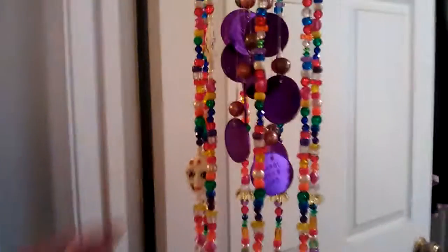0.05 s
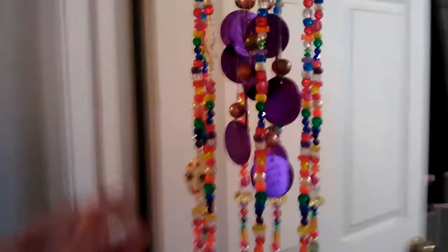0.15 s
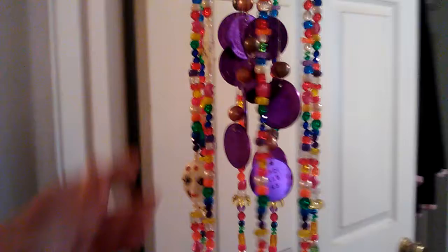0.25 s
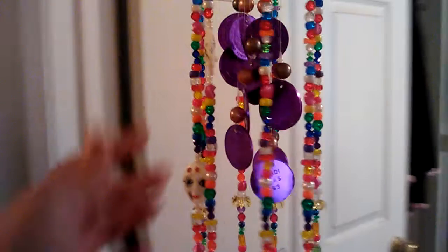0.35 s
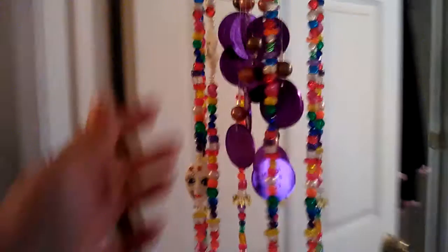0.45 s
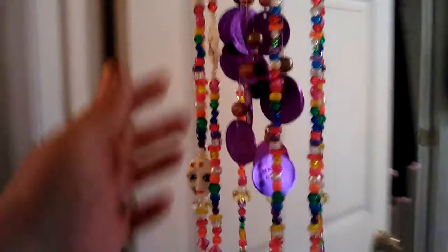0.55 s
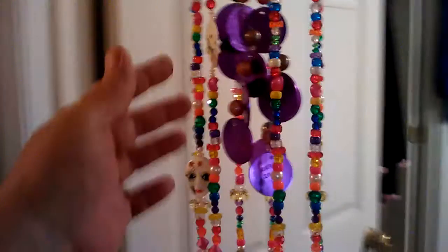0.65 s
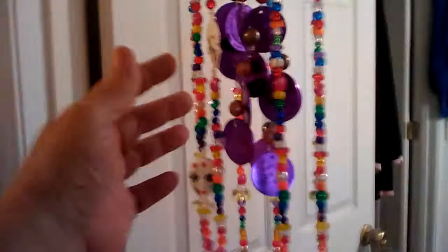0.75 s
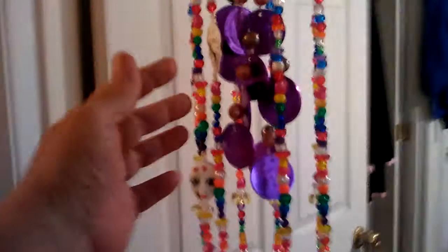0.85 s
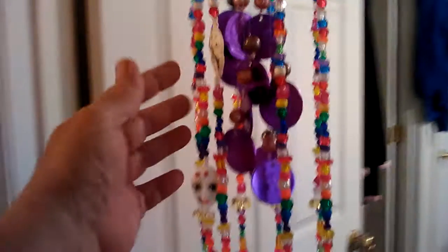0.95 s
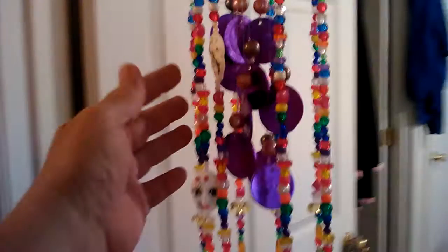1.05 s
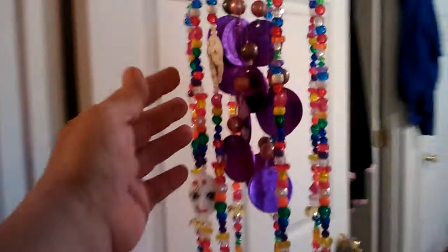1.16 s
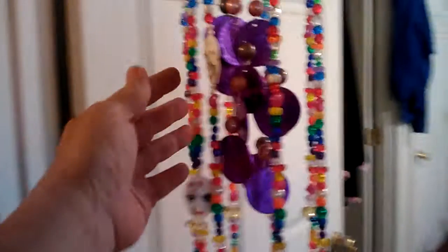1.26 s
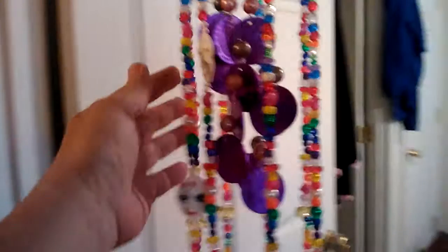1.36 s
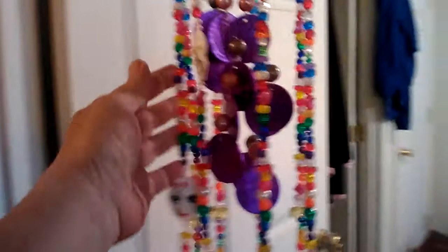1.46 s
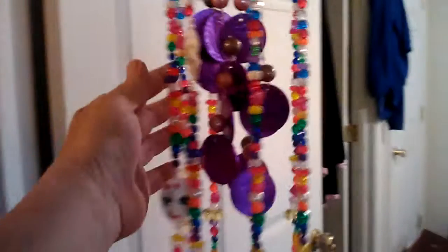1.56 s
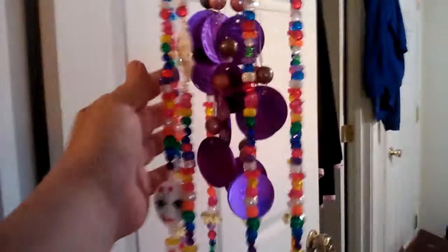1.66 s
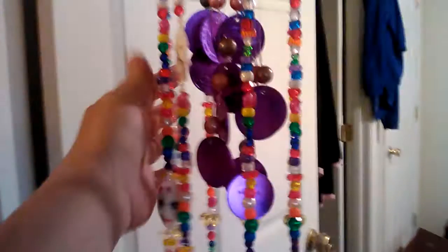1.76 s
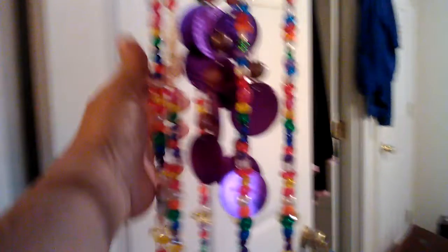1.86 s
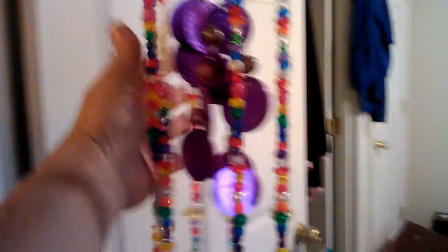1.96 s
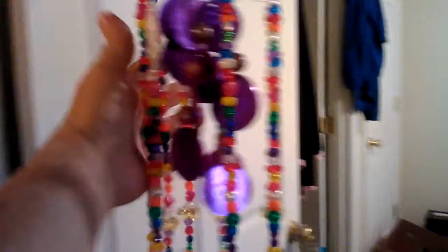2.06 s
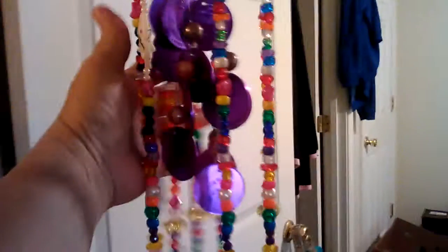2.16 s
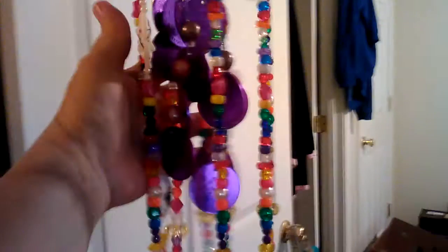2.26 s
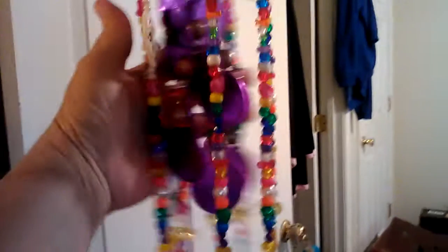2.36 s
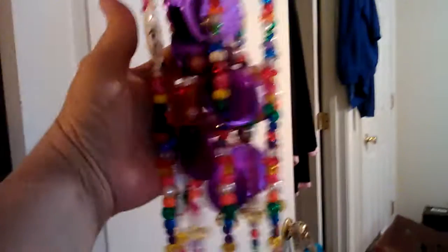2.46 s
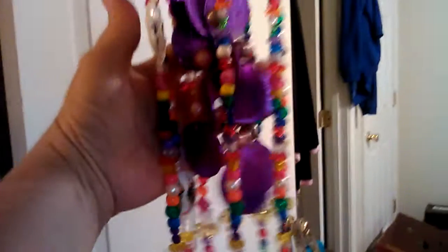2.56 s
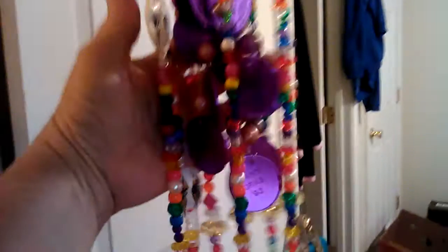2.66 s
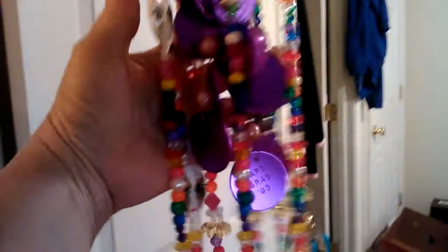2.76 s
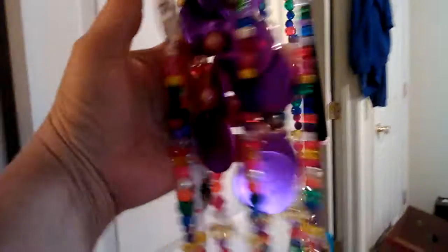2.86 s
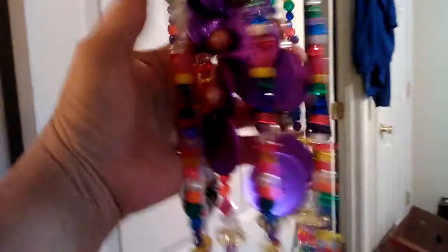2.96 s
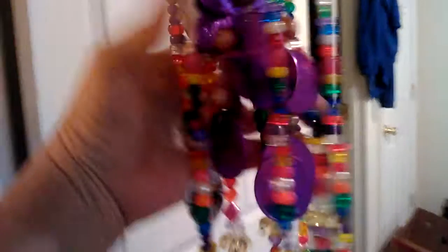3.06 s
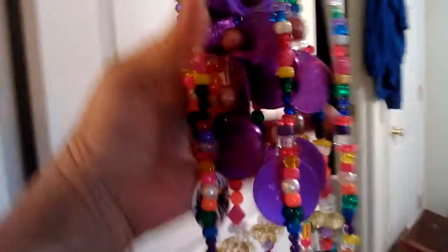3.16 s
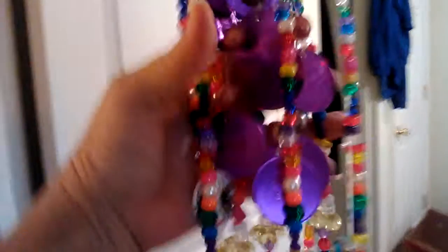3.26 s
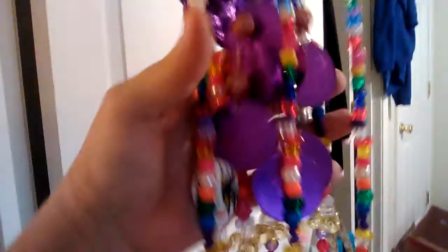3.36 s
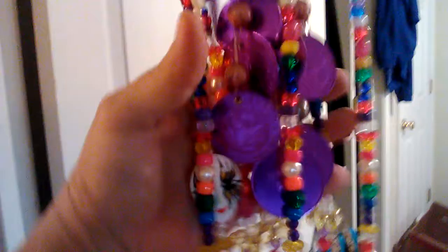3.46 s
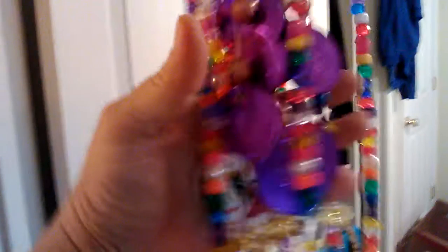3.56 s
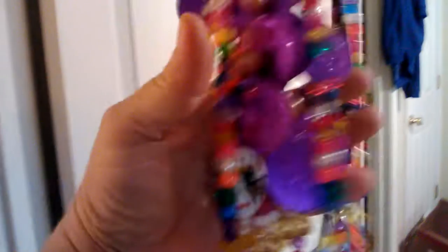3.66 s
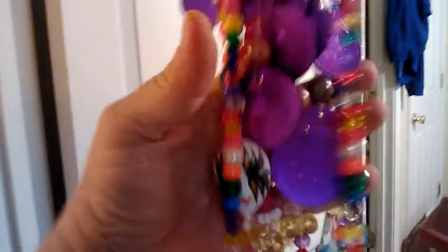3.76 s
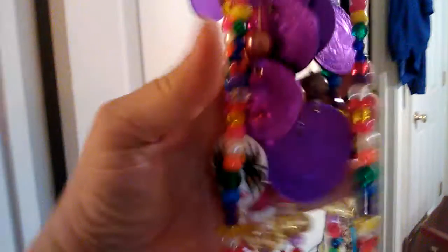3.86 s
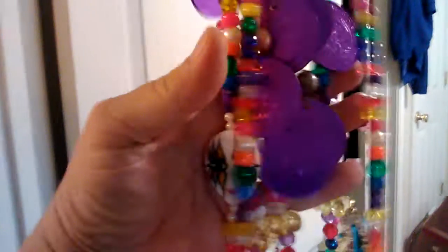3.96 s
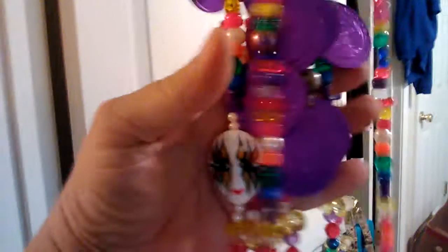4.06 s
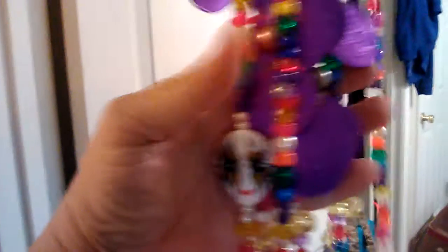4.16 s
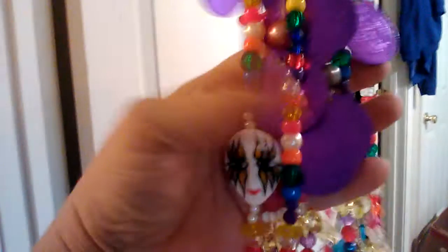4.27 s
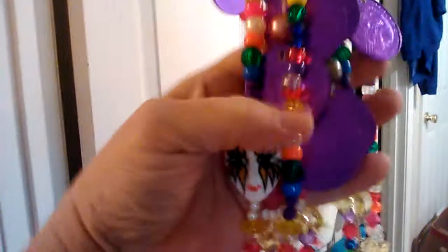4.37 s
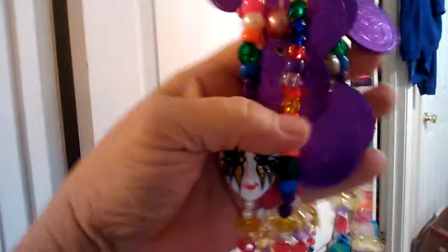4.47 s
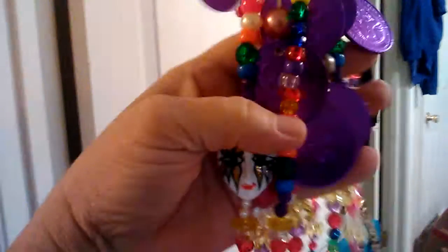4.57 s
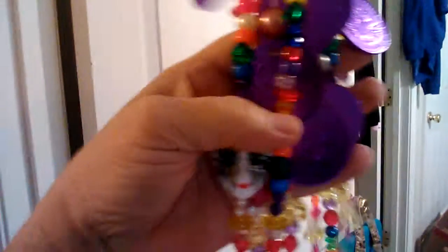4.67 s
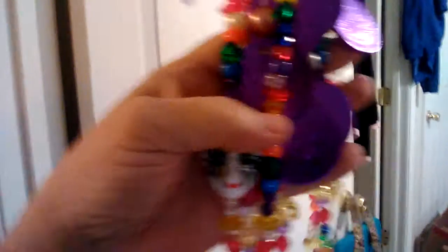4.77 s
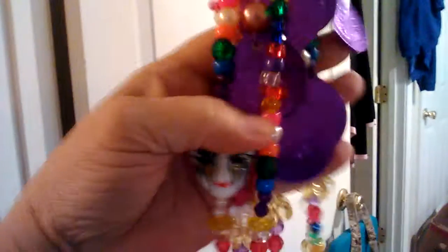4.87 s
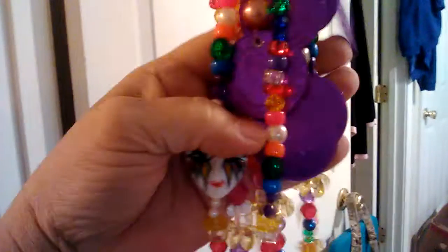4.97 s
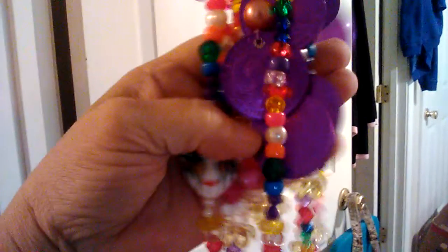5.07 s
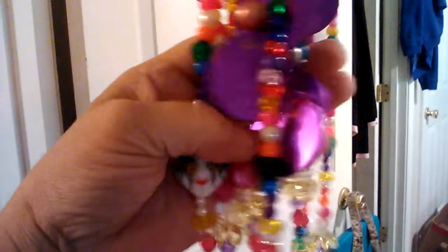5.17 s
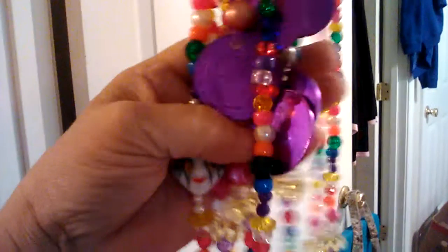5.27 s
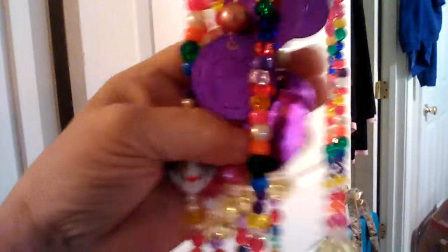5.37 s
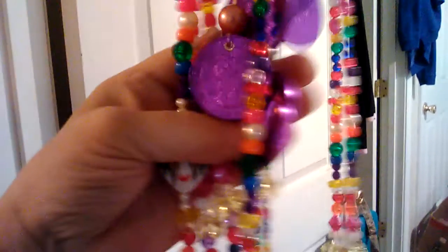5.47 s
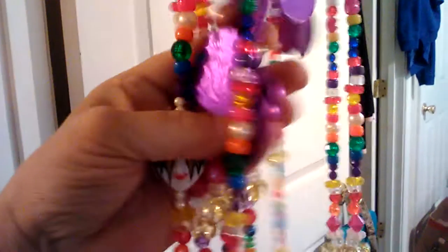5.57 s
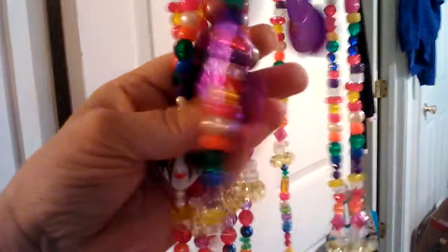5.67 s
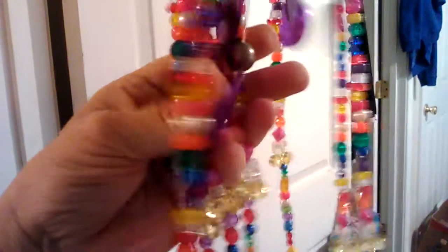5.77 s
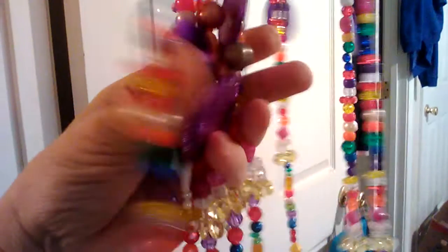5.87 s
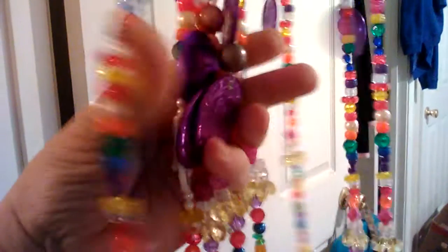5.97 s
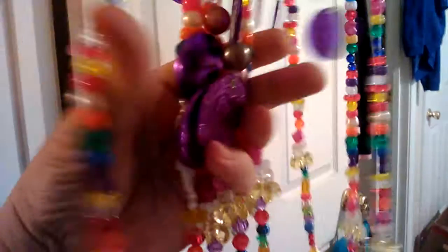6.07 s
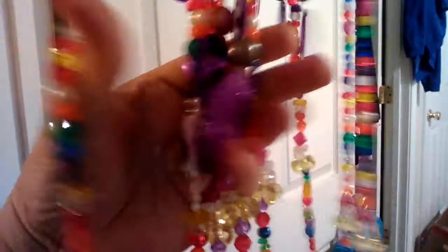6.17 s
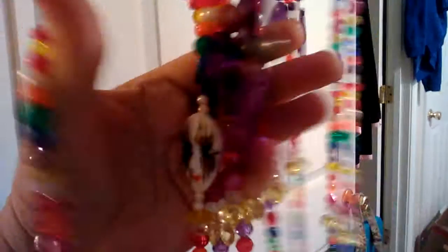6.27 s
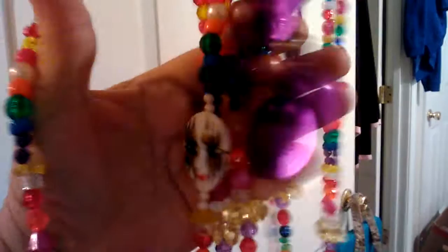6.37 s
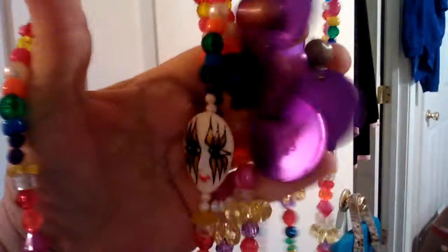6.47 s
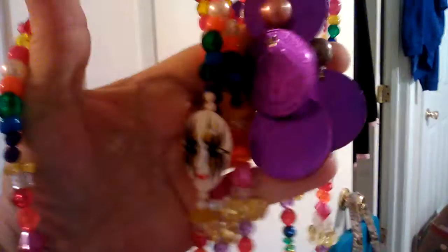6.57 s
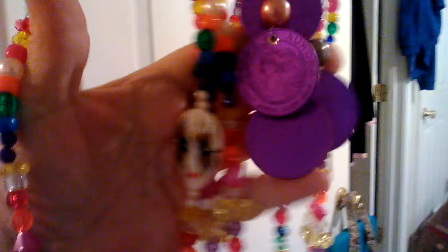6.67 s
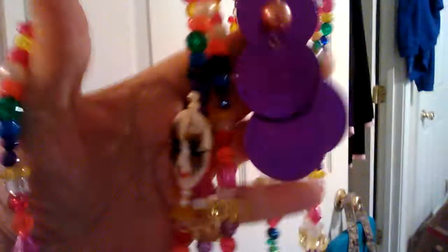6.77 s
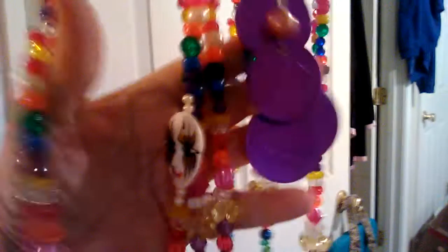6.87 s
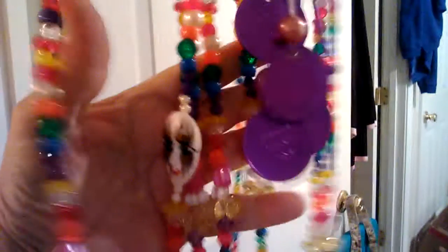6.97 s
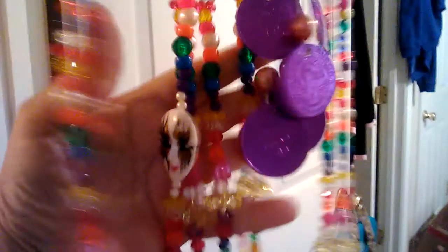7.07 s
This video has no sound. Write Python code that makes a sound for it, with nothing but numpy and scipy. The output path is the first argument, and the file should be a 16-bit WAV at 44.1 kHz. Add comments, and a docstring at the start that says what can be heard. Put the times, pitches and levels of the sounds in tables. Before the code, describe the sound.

Close, bright handling of beads and light discs indoors. Nearly two seconds of soft room hum come first, then a busy rattle of sharp ticks and tiny metallic pings, each ring soon choked by further touches. A sparse, held pause follows before two clicks and a fuller jangling shake that carries on to the end. A few dull, low bumps sit underneath, with very short room echo.

```python
"""Beads and discs shaken by hand

Strands of plastic beads and thin metal discs hang indoors; a hand gathers and shakes them close by.
Each contact clicks, knocks the hollow plastic and rings a disc, whose split modes beat until new touches choke them.
Tiny bead contacts rustle between, over a few soft low bumps and the hum of air and appliances in a small room.
Damped sines make the rings, filtered noise bursts the contacts; one microphone feeds both channels."""
import sys
import numpy as np
from scipy import signal
from scipy.fft import rfft, irfft, next_fast_len
from scipy.io import wavfile
from scipy.ndimage import uniform_filter1d, map_coordinates

SR = 44100
rng = np.random.default_rng(int(sys.argv[2]) if len(sys.argv) > 2 else 0)


def master(y):
    """Save y as 16-bit WAV."""
    cut = np.clip(np.atleast_2d(y).T, -1, 1)
    pcm = np.round(cut * 32767)  # scale
    wavfile.write(sys.argv[1], SR, pcm.astype(np.int16))


N = 313992

# the clear contacts, levels before each layer's trim: (time [s], middle ring level [dB], middle ring t60 [s],
# low ring level [dB], high ring level [dB], click level [dB], knock level [dB])
CLEAR_CONTACTS = [(1.7181, -32, 0.25, -44.5, -44, -41, -41.5), (1.8791, -47.5, 0.21, -44, -51, -43, -48),
                  (2.1656, -42, 0.062, -55, -65, -53, -61), (2.2588, -24.5, 0.077, -49, -46, -36, -51),
                  (2.3064, -16, 0.05, -31, -48, -30, -35.5), (2.3455, -38.5, 0.17, -48, -58, -59, -44),
                  (2.4232, -8, 0.14, -29, -33, -24.5, -46), (2.4371, -8, 0.12, -25.5, -34, -30, -46),
                  (2.4534, -16.5, 0.11, -32, -39, -29, -46), (2.4764, -7.5, 0.14, -26.5, -41, -28, -40.5),
                  (2.558, -21.5, 0.27, -39, -59, -45, -47), (2.587, -20.5, 0.09, -36, -56, -48, -50.5),
                  (2.6761, -23, 0.3, -32.5, -31.5, -42, -33.5), (2.7421, -8, 0.1, -32.5, -37, -25.5, -41),
                  (2.7734, -18, 0.1, -31.5, -43, -41, -51), (2.7997, -22, 0.11, -38, -41, -36.5, -48),
                  (2.821, -10, 0.048, -39, -39, -30, -51), (2.8317, -19, 0.1, -34, -44, -41, -57),
                  (2.8474, -15, 0.082, -50, -44, -39, -59), (2.8791, -11, 0.063, -37, -39, -31, -49),
                  (2.9442, -18, 0.062, -51, -49, -43, -63), (3.0111, -42, 0.19, -60, -43.5, -51, -64),
                  (3.051, -18.5, 0.061, -58, -42, -32.5, -48), (3.103, -46, 0.14, -41, -39, -54, -52),
                  (3.1474, -28, 0.26, -44, -38, -38, -48), (3.1845, -26.5, 0.08, -37, -45, -38, -49),
                  (3.1984, -21.5, 0.051, -49, -44, -33, -45), (3.256, -16.5, 0.1, -42.5, -46, -36, -42),
                  (3.2684, -21, 0.059, -49, -41, -44, -42.5), (3.3034, -37, 0.14, -65, -57, -52, -58),
                  (3.3613, -34.5, 0.3, -47, -50, -47, -52), (3.409, -31, 0.16, -37.5, -51, -45, -49),
                  (3.4363, -28, 0.11, -45, -34, -36, -38), (3.4453, -16, 0.1, -51, -33, -28, -37),
                  (3.4538, -16.5, 0.078, -35, -32, -36, -51), (3.4784, -30, 0.072, -40, -14.5, -34, -44),
                  (3.5084, -31, 0.12, -37, -32, -36, -52), (3.5369, -20, 0.063, -34, -39, -30.5, -42),
                  (3.5494, -35, 0.15, -42, -41, -57, -41.5), (3.62, -28, 0.034, -48, -59, -48, -59),
                  (3.6526, -38, 0.047, -50, -64, -48, -50), (3.7225, -20, 0.093, -33, -31.5, -34, -42.5),
                  (3.7623, -29, 0.058, -48, -36.5, -38, -43),
                  (3.8532, -21.5, 0.079, -49, -50.5, -38, -53.5), (3.878, -30.5, 0.16, -54, -41, -45, -51),
                  (3.9034, -26, 0.13, -50, -43.5, -40, -52.5), (4.0092, -27, 0.045, -44, -44.5, -30.5, -46),
                  (4.0244, -31.5, 0.086, -52, -54.5, -49, -43), (4.0381, -30, 0.089, -49, -55, -42, -52),
                  (4.058, -29.5, 0.053, -56, -60, -55, -60), (4.087, -40, 0.056, -48, -61, -42, -55),
                  (4.1065, -20.5, 0.065, -40, -53, -37, -43.5), (4.1274, -30, 0.1, -33, -49, -36, -43),
                  (4.1349, -17.5, 0.05, -51, -45, -44, -43), (4.1749, -40, 0.087, -54, -50, -59, -54),
                  (4.2077, -37, 0.073, -58, -53, -51, -63), (4.3523, -32.5, 0.2, -36.5, -48, -40, -49),
                  (4.436, -19.5, 0.04, -42.5, -61.5, -53, -53.5),
                  (4.5046, -28.5, 0.035, -43, -60.5, -46, -49),
                  (4.5441, -22.5, 0.085, -45, -65, -36.5, -45.5),
                  (4.6678, -42, 0.083, -44.5, -67, -62, -68), (4.775, -50.5, 0.1, -53, -66, -56.5, -65),
                  (4.818, -61, 0.1, -74.5, -64, -72, -67), (4.9806, -21, 0.088, -39, -38.5, -34.5, -42.5),
                  (5.0944, -14, 0.033, -41, -51, -37.5, -45), (5.1083, -5.5, 0.045, -54, -44, -30, -45),
                  (5.1394, -52, 0.053, -72, -57, -61, -52), (5.232, -16, 0.25, -35, -34, -33, -32.5),
                  (5.2773, -18.5, 0.17, -25, -15, -20, -29.5), (5.3103, -25.5, 0.3, -21, -29, -45, -56),
                  (5.353, -15.5, 0.15, -23, -22.5, -29, -34.5), (5.3941, -14, 0.15, -26.5, -25, -35, -59),
                  (5.4599, -33, 0.1, -38, -44, -44, -54.5), (5.5054, -27, 0.12, -39, -50, -53, -56),
                  (5.5231, -15.5, 0.082, -41, -44, -41, -54), (5.5408, -36, 0.069, -37, -45, -54, -44),
                  (5.6173, -31.5, 0.18, -47.5, -47, -51, -66), (5.688, -55, 0.11, -45, -53, -51, -51),
                  (5.724, -23.5, 0.3, -48, -41, -30.5, -39.5),
                  (5.7593, -21.5, 0.13, -33.5, -35, -55, -40.5), (5.7738, -20.5, 0.054, -52, -32, -43, -53),
                  (5.8045, -12, 0.052, -40, -41, -39, -52), (5.8536, -33, 0.17, -41, -40, -47, -59),
                  (5.897, -18, 0.1, -37, -40, -50, -49), (5.9125, -18, 0.079, -42, -41, -30.5, -48),
                  (5.9376, -27, 0.15, -34.5, -36, -34, -40.5), (5.9999, -22, 0.087, -39.5, -43, -44, -52),
                  (6.1015, -21, 0.04, -53, -46, -37, -50),
                  (6.1883, -15.5, 0.066, -40.5, -20.5, -29.5, -38.5),
                  (6.2356, -24, 0.11, -65, -47, -50, -49.5), (6.2495, -26, 0.097, -46, -47, -43, -60),
                  (6.2903, -21.5, 0.13, -30, -44, -32.5, -52), (6.3615, -28, 0.072, -66, -62, -53, -57),
                  (6.414, -23, 0.11, -57, -61, -48, -49), (6.4918, -30, 0.071, -50, -52, -57, -58),
                  (6.5036, -18.5, 0.08, -48, -48, -35.5, -45), (6.5326, -11.5, 0.07, -32, -44, -32, -43),
                  (6.5434, -25, 0.062, -62, -63, -46, -65), (6.6727, -41.5, 0.068, -77, -73, -66, -69),
                  (6.783, -58, 0.24, -77, -49, -74, -70), (6.8476, -14.5, 0.069, -37.5, -41, -36, -43),
                  (6.883, -7, 0.085, -24.5, -31, -30, -38), (6.8974, -19, 0.12, -21.5, -44, -43, -33),
                  (6.9187, -25, 0.13, -40, -47, -43, -59), (6.9623, -11.5, 0.049, -28.5, -52, -35, -43),
                  (7.0113, -32, 0.17, -36.5, -61, -62, -51.5), (7.0873, -16.5, 0.089, -30, -53, -43, -52)]
# colour of hard bead contact: (frequency [Hz], relative level [dB])
CLICK_SPECTRUM = [(2500, -48.5), (4000, -10), (5000, -1), (8000, -2.5), (10500, -4.5), (13500, -1.5),
                  (14300, -10.5), (14600, -28), (15400, -37.5)]


def amp(db):
    """Decibels to linear amplitude."""
    return 10 ** (np.asarray(db) / 20)


def unit(x):
    """Scale to an rms of one."""
    return x / np.sqrt(np.mean(x ** 2) + 1e-20)


def along(points, hz):
    """Read a (frequency, value) curve on a log frequency axis."""
    f, v = np.transpose(points)
    return np.interp(np.log(hz + 1), np.log(f + 1), v)


def curve(rows):
    """Turn (time, value) points into one value per sample."""
    return np.interp(np.arange(N) / SR, *np.transpose(rows))


def wobble(rate):
    """A smooth random curve, rate knots a second."""
    knots = rng.standard_normal(int(N * rate / SR) + 4)
    return map_coordinates(knots, [np.arange(N) * rate / SR])


def filtered(x, response):
    """Shape x by a real or complex response of frequency."""
    m = next_fast_len(N + SR // 2)
    return irfft(rfft(x, m) * response(np.fft.rfftfreq(m, 1 / SR)), m)[..., :N]


def whine():
    """Steady electric tones, each swaying slightly in level."""
    # (frequency [Hz], level before a 7 dB lift [dB])
    whine_tones = [(9373, -73.5), (12511, -85.5)]
    t = np.arange(N) / SR
    return sum(amp(db + 7 + .8 * wobble(20)) * np.sin(2 * np.pi * hz * t) for hz, db in whine_tones)


def air():
    """Room air and far appliances: one noise split into a lumpy rumble, a murmur of moving air and hiss."""
    # noise colour: (frequency [Hz], relative level [dB])
    air_spectrum = [(12, -40), (33, -14), (50, 3), (75, -1), (259, -12.5), (330, -13), (640, -19.5),
                    (778, -28.5), (930, -22.5), (1110, -28.5), (3700, -33.5), (4290, -38), (9500, -41),
                    (14250, -41), (14500, -100)]
    # slow swell of rumble and murmur: (time [s], level [dB])
    air_swell = [(0, -51.5), (1.7, -49.5), (2.0, -52), (2.5, -51.5), (7.12, -50.5)]
    noise = unit(filtered(rng.standard_normal(N), lambda hz: amp(along(air_spectrum, hz))))
    rumble = filtered(noise, lambda hz: 1 / (1 + (hz / 180) ** 2))
    low = filtered(noise, lambda hz: 1 / (1 + (hz / 800) ** 2))
    murmur, hiss = low - rumble, noise - low
    lumps = wobble(12)
    moving = rumble * amp(2.4 * lumps) + murmur * amp(1.5 * lumps + 2.2 * wobble(9))
    return amp(curve(air_swell) + 2.45 * wobble(11)) * moving + amp(-47.5) * hiss + whine()


def bumps():
    """Soft low bumps: one push and its rebound."""
    # (time [s], level before a 4.5 dB lift [dB])
    bump_times = [(1.029, -36), (3.53, -39), (4.999, -29), (6.22, -32), (6.502, -38)]
    push_s = 0.0021  # time scale; the push turns into rebound after twice this
    out, u = np.zeros(N + SR), np.arange(SR // 10) / SR / push_s
    for s, db in bump_times:
        out[round(s * SR):][:len(u)] -= amp(db + 4.5) * u * (2 - u) * np.exp(-u)
    return out[:N]


def pings(count, hz, spread, cycles):
    """Rows of short damped sines, each of its own pitch and life."""
    chance, t = rng.standard_normal((count, 2, 1)), np.arange(256) / SR
    f = np.clip(hz * np.exp(spread * chance[:, 0]), 500, 14000)
    life_cycles = cycles * np.exp(.35 * chance[:, 1])
    return np.sin(2 * np.pi * f * t) * np.exp(-t * f / life_cycles)


def resonance(f, centre, width, db):
    """Complex response of one damped resonance, strongest at its centre."""
    return amp(db) * 1j * f * width / (centre * centre - f * f + 1j * f * width)


def hollow(f):
    """Resonances of hollow beads and cupped hand, added with alternating sign."""
    # (frequency [Hz], width [Hz], level [dB])
    knock_modes = [(870, 100, -4.5), (2022, 320, 5), (2475, 543, 4.5), (2840, 670, 1.5)]
    return sum((-1) ** k * resonance(f, *mode) for k, mode in enumerate(knock_modes))


def rustle(spread_db=0.5, ring_db=-6, knock_db=-7, count=7000):
    """Beads sliding on their strings: many tiny ticks of uneven size and pitch that also set the discs humming."""
    # (time [s], level before a 4.4 dB lift [dB])
    rustle_level = [(1.6, -74.5), (2.32, -66.5), (2.64, -55), (3.0, -61), (3.57, -58), (4.29, -68),
                    (4.64, -68.5), (4.78, -73), (5.0, -73.5), (5.29, -59), (5.64, -63.5), (5.89, -57),
                    (6.03, -64), (6.41, -61), (6.58, -68), (6.89, -71), (7.01, -58.5), (7.12, -58)]
    # all discs together, lightly brushed: (frequency [Hz], width [Hz], level [dB])
    hum_modes = [(5300, 110, 14), (8970, 450, 14.5), (11830, 80, 14)]
    grains = pings(count=count, hz=7430, spread=.55, cycles=2.4)
    grains = grains * amp(spread_db * rng.standard_normal((count, 1)))
    where = rng.integers(0, N, (count, 1)) + np.arange(grains.shape[1])
    ticks = unit(np.bincount(where.ravel(), grains.ravel())[:N]) + 0.13 * rng.standard_normal(N)
    # all but silent until the rustle sets in at 1.7 s
    level = np.where(np.arange(N) / SR < 1.7, -120, curve(rustle_level))
    ticks = ticks * amp(level + 4.4)

    def colour(f):
        hum = sum(resonance(f, *mode) for mode in hum_modes)
        return amp(along(CLICK_SPECTRUM, f)) + amp(knock_db) * hollow(f) + amp(ring_db) * hum

    return filtered(ticks, colour)


def contacts(count=70):
    """The clear contacts, and light chance rebounds that trail them."""
    # a rebound's low ring, high ring, click and knock: (level against its middle ring [dB])
    brush_parts = [-27.5, -21.5, -14, -24]
    brush_db, scatter_db = -15.5, 5.5  # middle ring against the contact it follows, and its spread
    brush_t60, delay_s = 0.066, 0.027  # s; mean wait on top of the first 8 ms
    parent = np.array(CLEAR_CONTACTS)[rng.integers(0, len(CLEAR_CONTACTS), count)]
    s = np.minimum(parent[:, 0] + .008 + delay_s * rng.exponential(size=count), N / SR)
    chance = scatter_db * rng.standard_normal((count, 1 + len(brush_parts)))
    db = parent[:, 1] + brush_db + chance[:, 0]
    parts = db[:, None] + brush_parts + chance[:, 1:]
    rebounds = np.column_stack([s, db, np.full(count, brush_t60), parts])
    return list(CLEAR_CONTACTS) + list(rebounds)


def clicks(rows):
    """The hard contact: a crack coloured by the bead that is hit, a short rattle, a knock in the plastic."""
    crack, blows, t = np.zeros(N + SR), np.zeros(N + SR), np.arange(SR // 16) / SR
    for s, *_, click_db, knock_db in rows:
        puff = rng.standard_normal((3, len(t)))
        bright = pings(count=3, hz=9300, spread=0.37, cycles=7.7).sum(0)
        dull = pings(count=2, hz=2450, spread=0.31, cycles=1.0).sum(0)
        snap = puff[0] * amp(-60 * t / 0.0042)
        thud = puff[1] * amp(-60 * t / 0.012)
        # neighbours chatter in clumps
        clumps_db = 26 * uniform_filter1d(puff[1], size=49)
        rattle = puff[2] * amp(-60 * t / 0.11 + clumps_db)
        bead_snap = 0.94 * snap + 0.14 * np.convolve(snap, bright)[:len(t)]
        bead_thud = 0.73 * thud + 0.039 * np.convolve(thud, dull)[:len(t)]
        at = round(s * SR)
        crack[at:][:len(t)] += amp(click_db + 8.0) * (bead_snap + amp(-12.0) * rattle)
        blows[at:][:len(t)] += amp(knock_db + 15) * (bead_thud + amp(-17) * rattle)
    cracks = filtered(crack[:N], lambda hz: amp(along(CLICK_SPECTRUM, hz)))
    return cracks + filtered(blows[:N], hollow)


def rings(rows, scatter_db=1.27):
    """Every contact rings a disc's close mode pairs, which beat; each later clear contact chokes some of it."""
    # (frequency, or for family 1 offset from the disc's pitch [Hz], level [dB],
    # t60 as a multiple of its family's, family: 0 low, 1 middle, 2 high)
    disc_modes = [(5215, 0, 1, 0), (5277, -7, 1, 0), (0, 0, 1, 1), (55, -13, 1.2, 1), (11768, -8, 1.5, 2),
                  (11855, 0, 1.5, 2)]
    # weak disc modes: (frequency [Hz], level against the middle ring [dB], t60 [s])
    overtones = [(6620, -47.5, .06), (6970, -37, 0.058), (11900, -36.5, 0.12), (12500, -38.5, 0.11)]
    # what a later touch takes from the low, middle and high ring: (loss [dB])
    choke_db = [57, 21, 15]
    # how far brushing strings and neighbours unsettle each ring's phase: (depth [rad])
    flutter = [.6, 1.1, .85]
    # each ring's beam swinging past the listener: (depth [dB], changes a second [1/s])
    twist = [(3, 43), (1.6, 120), (2.1, 80)]
    pitch_hz, pitch_scatter_hz = 9059, 45  # the middle ring moves with how the disc hangs
    low_t60 = 0.42  # s; the low ring hangs on however the disc is held

    out, t = np.zeros((len(choke_db), N + SR)), np.arange(SR // 3) / SR
    times = np.array([row[0] for row in CLEAR_CONTACTS])
    family = np.array([int(row[-1]) for row in disc_modes] + [1] * len(overtones))
    member = 1. * (np.arange(len(choke_db))[:, None] == family)  # sums modes into families
    wander = np.pad([rad * wobble(130) for rad in flutter], [(0, 0), (0, SR)])
    for s, db, t60, low_db, high_db, click_db, _ in rows:
        at = round(s * SR)
        chance = rng.standard_normal((2, len(family), 1))
        pitch = pitch_hz + pitch_scatter_hz * rng.standard_normal()
        t60 = np.clip(t60, .02, .6)
        # each family's level is set against the middle ring
        base_hz = (0, pitch, 0)
        lift_db = (low_db - db - 2.5, 0, high_db - db + 2)
        base_t60 = (low_t60, t60, t60)
        modes = [(f + base_hz[int(k)], level + lift_db[int(k)], base_t60[int(k)] * longer)
                 for f, level, longer, k in disc_modes]
        f, level, life = np.transpose(modes + list(overtones))[..., None]
        # low and high modes are pushed on in step; the middle ones, shifted by how the disc is held, start afresh
        start = np.where(family[:, None] == 1, chance[0], f * s)
        phase = 2 * np.pi * (f * t + start) + wander[family, at:][:, :len(t)]
        # count later clear contacts, each easing in over about 2 ms
        touches = uniform_filter1d(np.searchsorted(times, s + t) * 1., size=96)
        touches = np.clip(touches - np.searchsorted(times, s + .001), 0, None)
        fading = 60 * t / life + np.take(choke_db, family)[:, None] * touches
        # a glancing touch clicks little and swells slowly
        rise_s = .0005 + .0003 * amp(-.8 * (click_db - db + 28))
        size = amp(db + 0.5 + level + scatter_db * chance[1] - fading)
        ring = size * np.sin(phase) * (1 - np.exp(-t / rise_s))
        out[:, at:][:, :len(t)] += member @ ring
    # a disc twisting on its string beams each mode towards and away from the listener
    return sum(amp(db * wobble(rate)) * part[:N] for (db, rate), part in zip(twist, out))


def room(x):
    """Small-room echo: a noise tail in which each frequency dies at its own speed."""
    # (frequency [Hz], t60 [s])
    room_t60 = [(500, 0.17), (3000, 0.2), (9000, 0.11), (14000, 0.064)]
    hz, t, z = signal.stft(rng.standard_normal(SR // 2), SR, nperseg=256)
    decay = amp(-60 * t / along(room_t60, hz)[:, None])
    tail = signal.istft(z * decay, SR, nperseg=256)[1]
    delayed = np.pad(x, (130, 0))  # 3 ms before the echo starts
    return signal.fftconvolve(delayed, tail / np.linalg.norm(tail))[:N]


def scene():
    """Beads and discs close by, their echo, the room's air and low bumps, alike in both channels."""
    rows = contacts()
    hits, tones = clicks(rows) + rustle(), rings(rows)
    echo = room(amp(-8.5) * hits + amp(-16.0) * tones)
    mono = hits + tones + echo + air() + bumps()
    return np.array([mono, mono])


def record(dry):
    """Remove everything above the microphone's band limit."""
    top_hz = 15420
    return filtered(dry, lambda hz: hz < top_hz)


dry = scene()
out = record(dry)
master(out)
```